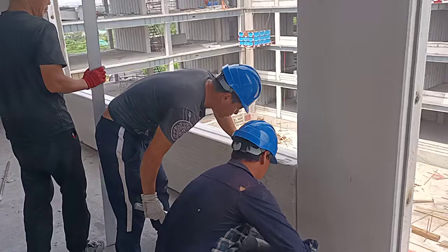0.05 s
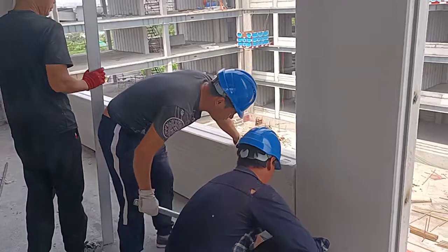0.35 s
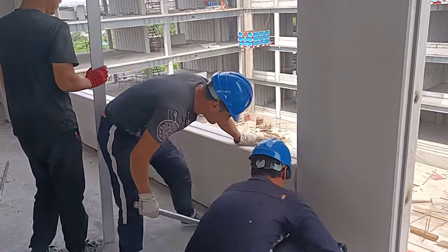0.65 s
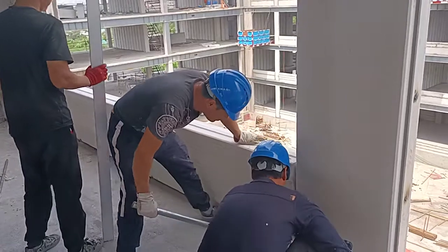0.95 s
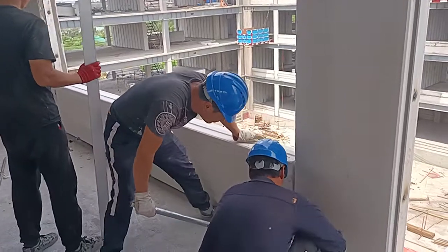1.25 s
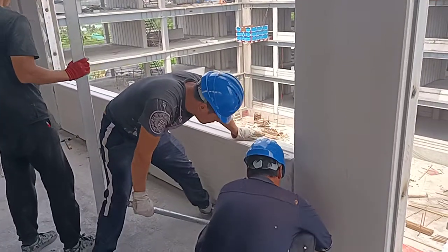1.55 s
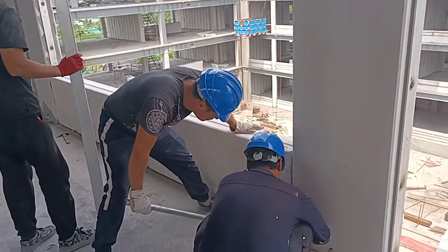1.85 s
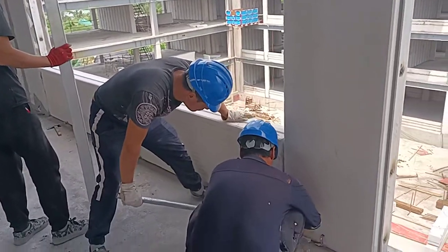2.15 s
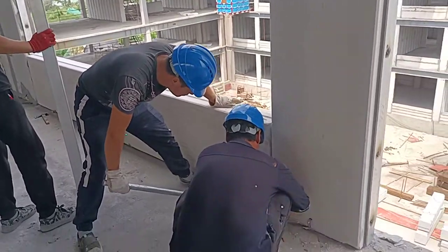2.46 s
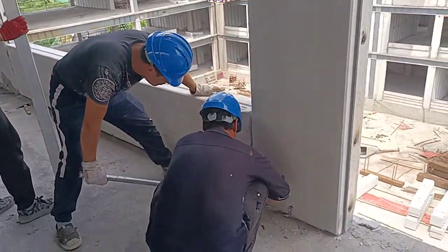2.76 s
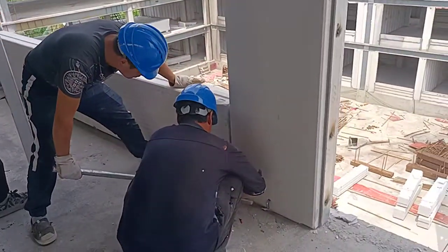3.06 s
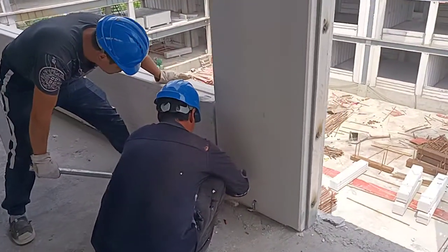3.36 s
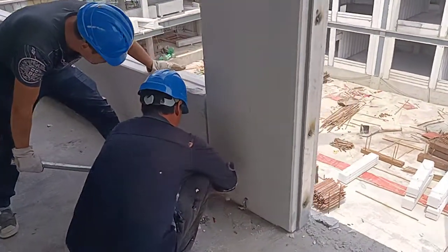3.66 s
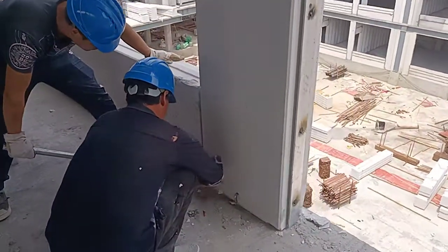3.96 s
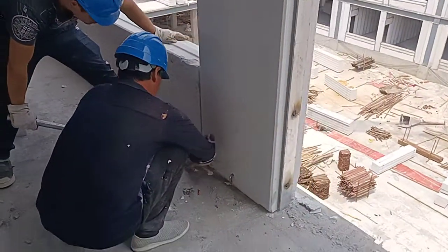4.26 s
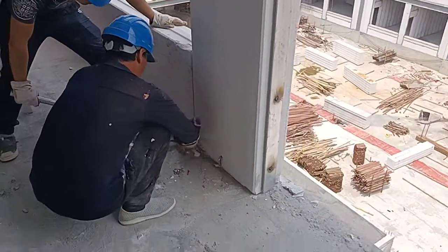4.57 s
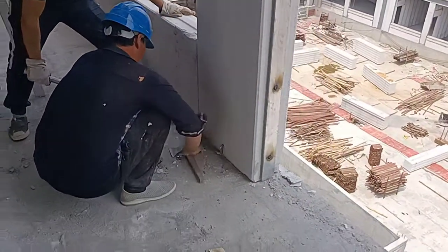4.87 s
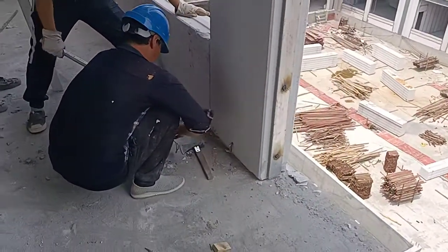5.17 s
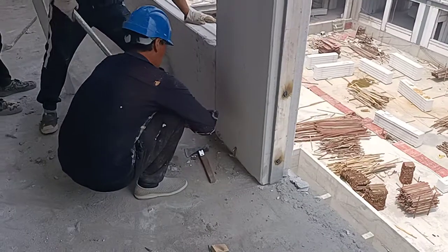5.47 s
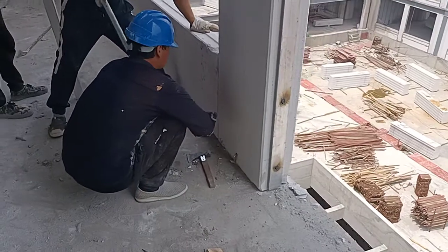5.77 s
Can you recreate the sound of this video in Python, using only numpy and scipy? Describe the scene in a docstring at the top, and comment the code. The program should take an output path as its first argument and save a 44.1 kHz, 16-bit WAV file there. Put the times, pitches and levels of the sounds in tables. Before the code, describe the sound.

A hammer drives a steel wedge under a concrete panel with seven sharp, booming blows, then tools clink and scrape over distant machinery.

```python
"""An open floor of a building site, heard through the two ports of a stereo microphone.
Nearby, a worker drives a steel wedge under a concrete wall panel with seven hammer blows, one a double
strike. Each blow cracks, the panel booms, higher as it tightens, and bare slabs throw both back.
The hammer is laid down with a few clinks and a steel pry bar scrapes free; boots thud and grit scuffs.
Far off, a machine hums and clatters through two runs, over the hiss of the site."""
import sys
import numpy as np
from scipy import signal
from scipy.fft import rfft, irfft
from scipy.io import wavfile
from scipy.ndimage import uniform_filter1d

SR = 44100
rng = np.random.default_rng(int(sys.argv[2]) if len(sys.argv) > 2 else 0)


def pcm_store(signal):
    """Save signal as 16-bit PCM."""
    levels = np.round(np.clip(np.atleast_2d(signal), -1, 1) * 32767)
    wavfile.write(sys.argv[1], SR, levels.astype(np.int16).T)


N = 256220
TIME, BINS = np.arange(N) / SR, np.fft.rfftfreq(N, 1 / SR)
AGE = np.arange(SR) / SR  # seconds since an impact


# The hammer blows, near the microphone. Each row: start in seconds, force in dB, squareness as
# brightness in dB per octave, then the relative levels in dB of wash, wedge clang and concrete knock.
BLOWS = [(2.596, -23, -2, -3.5, -17, -14), (2.938, -13, 2, -7.5, -4.5, -16.5),
         (3.3008, -12, 1, -12.5, -8.5, -15.5), (3.7061, -12.5, 0.65, -5, -13, -13),
         (4.0305, -14.5, 3.5, -4.5, -21, -19.5), (4.2893, -22, 2.5, -17.5, -21.5, -4.5),
         (4.2993, -16, 0, -14.5, -35.5, -11), (4.553, -16, 2.5, -8, -13, -13)]

def hammering(loose_tilt=-19.5, tight_tilt=6.5, full_force_db=-13, take_up=0.48):
    """Each blow drives the wedge in and tightens the panel; a square one cracks louder and longer."""
    out, slack = np.zeros((2, N)), 1
    for start, force_db, square, wash_db, clang_db, knock_db in BLOWS:
        spot_db = struck_spot()
        tilt = tight_tilt + (loose_tilt - tight_tilt) * slack  # of the panel's modes, dB per octave
        crack_db = -0.55 + 0.37 * square
        boom_db = 4 + 0.24 * tilt  # a tight panel takes more of the blow
        steel = wedge_crack(square, spot_db) + amp(clang_db) * wedge_clang()
        wash = slab_wash(square, spot_db, hold_s=0.041 + 0.0089 * square)
        concrete = knock(hz=955, width_hz=400, t60=0.054, room_db=-7.5)
        blow = amp(crack_db) * steel + amp(wash_db) * wash + amp(knock_db) * concrete
        blow += amp(boom_db) * panel_boom(tilt)
        add(out, start, amp(force_db) * blow + amp(tilt - 38) * head_ring(spread_db=3))
        # a full blow takes up the share take_up of the remaining slack
        slack *= 1 - min(take_up * amp(force_db - full_force_db) ** 2, 1)
    return out


# The modes of the steel wedge. Each row: frequency in Hz, level in dB.
WEDGE_MODES = [(1400, -7), (1880, 0), (2350, 1), (2940, -1.5), (3580, -1.5), (4300, 0), (5175, -3),
               (5900, -8.5), (6950, -5)]
# Floor and nearest walls, as heard at the microphone. Each row: echo delay in seconds, level in dB.
EARLY_ECHOES = [(.0128, -4), (.0212, -2), (.0235, -8), (.0305, -11), (.0375, -9), (.0445, -9)]

def wedge_crack(bright, spot_db, width_hz=380, detune=0.01):
    """Steel meets the wedge: its modes burst out, a trace sings on, near surfaces repeat the burst."""
    body = sum(amp(db) * resonance(np.arange(len(spot_db)), f, width_hz) ** 2 for f, db in WEDGE_MODES)
    modes = [(f * (1 + detune * rng.uniform(-1, 1)), db + bright * np.log2(f / 3000))
             for f, db in WEDGE_MODES]

    def burst(tilt):
        return diffuse(lambda hz: amp(tilt_db(hz, tilt) + spot_db / 2) * body, SR)

    def steel(t60):
        return ring([(f, db, t60) for f, db in modes], spread_db=4) * rising(0.0011)

    out = amp(1) * burst(bright) * dying(0.036, hold_s=0.0016)
    out += amp(-7) * steel(t60=0.022) + amp(-22) * steel(t60=0.38)
    for delay, db in EARLY_ECHOES:
        add(out, delay, amp(db) * burst(bright + 2.5) * dying(0.014, hold_s=0.001))
    return out


def wedge_clang(return_s=0.2):
    """The wedge clangs, and the far wing of the building sends the clang back."""
    envelope = dying(0.25) + amp(-14) * dying(0.41) + amp(-23) * swell(AGE, return_s, 0.12)
    return noise_band(2080, 480, SR) * envelope


# The modes of the concrete panel. Each row: frequency in Hz, level in dB, 60 dB decay time in seconds.
PANEL_MODES = [(118.5, -12, 0.32), (142.5, -12.5, 0.53), (169.8, -13, 1), (192.3, -4.5, 0.62),
               (234.5, -5.5, 0.28), (268.5, -2.5, 0.62), (328, -3, 0.52), (341.7, -5.5, 0.96),
               (429.7, 0, 0.63), (541, -12.5, 0.7), (632, -12, 0.29), (759, -22.5, 0.3)]

def panel_boom(tilt, delay_s=0.01374, lurch_hz=310, detune=0.01, blur_hz=20):
    """The heavy panel lurches just after the crack, then rings; tilt weights its upper modes."""
    t = AGE - delay_s
    lurch = swell(AGE, delay_s, 0.0026) * np.cos(2 * np.pi * lurch_hz * t)
    build = 0.36 * rising(0.0059) + np.clip(t / 0.0097, 0, 1)
    # the panel shifts in its seat, so its notes differ from blow to blow
    modes = [(hz * (1 + detune * rng.uniform(-1.056, 1)), db + tilt * np.log2(max(hz, 300) / 300), t60)
             for hz, db, t60 in PANEL_MODES]

    def blurred_notes(hz):
        notes = np.sqrt(sum((amp(db) * resonance(hz, f, blur_hz)) ** 2 for f, db, _ in modes))
        return notes * resonance(hz, 260, 1200) * hz / np.hypot(hz, 70)

    room = diffuse(blurred_notes, SR) * dying(0.66)
    return amp(4) * lurch + build * (amp(-11) * ring(modes, spread_db=2) + amp(-9.5) * room)


# A blow as it comes back off the bare slabs. Each row: frequency in Hz, spectral level in dB.
WASH_SPECTRUM = [(400, -16), (750, -3), (1100, -4), (1500, -4), (2050, 1.5), (2700, 1), (4400, -2.5),
                 (5900, -6.5), (7000, -11.5), (12000, -74)]

def slab_wash(bright, spot_db, hold_s, rattle_db=3.2):
    """Near reflections thicken and die fast, rattling with grit; far parts of the building ring on."""
    def reflections(tilt):
        return diffuse(lambda hz: amp(at_hz(WASH_SPECTRUM, hz) + tilt_db(hz, tilt) + spot_db)
                       * hz / np.hypot(hz, 130), SR)

    near = reflections(bright) * dying(0.36, hold_s)
    far = reflections(1.8 * bright + 0.36) * dying(1.0, hold_s)
    rattle = unit(amp(rattle_db * wander(250)))[:SR]
    return rising(0.038) * (rattle * near + amp(-12) * far)


# The modes of the hammer head. Each row: frequency in Hz, level in dB, 60 dB decay time in seconds.
HEAD_MODES = [(3560, 2, .16), (6580, -1, .14), (11100, -6, .13)]

def head_ring(spread_db):
    """The steel hammer head rings high and briefly."""
    return ring(HEAD_MODES, spread_db)


# Steel tools touch the floor nearby. Each row: start in seconds, level in dB, pitch in Hz.
TOOL_CLINKS = [(4.813, -20, 4330), (4.812, -28.5, 2930), (4.918, -26, 3670), (4.969, -22, 2860),
               (4.968, -30, 2040), (5.014, -38, 2800)]
# The hammer head rings freely as it is laid down. Each row: start in seconds, level in dB.
HEAD_TOUCHES = [(4.815, -35), (4.918, -26)]

def tools_laid_down():
    """Steel clacks on concrete and rings; the higher a clink, the sooner it dies."""
    out = np.zeros((2, N))
    for start, db, hz in TOOL_CLINKS:
        t60 = 0.045 * (3000 / hz) ** 2
        steel = ring([(hz, 0, t60)], spread_db=0)
        add(out, start, amp(db) * (knock(hz, hz / 5, t60) / 2 + steel))
    for start, db in HEAD_TOUCHES:
        add(out, start, amp(db) * head_ring(spread_db=0))
    return out


# The modes of the rubbed pry bar. Each row: frequency in Hz, level at mid-slide in dB, width in Hz,
# level change along the slide in dB per second.
BAR_MODES = [(1887, -3.5, 86, 15), (2300, 0.5, 310, -23), (2610, -4, 26, 21), (2920, -14, 50, 43),
             (3360, -5, 60, -7), (4210, -3.5, 160, 9), (5090, -8.5, 61, 14), (11050, -8, 870, 6)]

def pry_bar(start_s=5.255, stop_s=5.57, rise_s=0.026, fall_db_per_s=187, sag_per_s=0.044):
    """Grit rubs the bar until it comes free; as the contact slides, its modes flare and sag in pitch."""
    slide_s = np.clip(TIME, start_s, stop_s) - (start_s + stop_s) / 2
    steel = sum(amp(db + drift * slide_s + 2.3 * wander(14)) * noise_band(hz, width, N)
                for hz, db, width, drift in BAR_MODES)
    sagging = np.cumsum(1 - sag_per_s * slide_s)
    steel = np.array([np.interp(sagging, np.arange(N), port, period=N) for port in steel])
    grit = diffuse(lambda hz: resonance(hz, 3200, 4600), N) * amp(2 * wander(150))
    attack = np.clip((TIME - start_s) / rise_s, 0, 1)
    level = amp(-34.5 - fall_db_per_s * np.maximum(TIME - stop_s, 0))
    shared_flare = amp(1.5 * wander(11))
    return attack * level * (shared_flare * steel / 2 + amp(-10.5) * grit)


def tap_and_ping(tap_s=2.27, ping_s=5.282):
    """The wedge is set in place with one dull tap; later the pry bar pings as it catches."""
    out = np.zeros((2, N))
    add(out, tap_s, amp(-36) * knock(hz=1900, width_hz=950, t60=0.12))
    add(out, ping_s, amp(-31) * knock(hz=7310, width_hz=62, t60=0.14))
    return out


# The worker's steps on the slab. Each row: start in seconds, level in dB.
BOOT_STEPS = [(0.758, -42), (2.23, -46.5), (4.967, -41.5)]

def boots():
    """Each boot comes down with a dull thud."""
    out = np.zeros((2, N))
    for start, db in BOOT_STEPS:
        add(out, start, amp(db) * knock(hz=244, width_hz=99, t60=0.95))
    return out


# Slides on the gritty floor. Each row: middle in seconds, level in dB, centre in Hz,
# half length in seconds.
GRIT_SCUFFS = [(0.434, -43, 2300, 0.067), (2.54, -46.5, 6760, 0.28), (2.593, -33.5, 260, 0.036),
               (2.612, -24.5, 2270, 0.021), (2.613, -29.5, 5770, 0.027), (4.887, -31.5, 2520, 0.031),
               (5.002, -31.5, 2300, 0.037)]

def scuffs(grain_db=3):
    """Boots, tools and the loose wedge slide over grit: grainy rubs that swell and fade."""
    rubs = sum(amp(db) * swell(TIME, middle, half) * noise_band(hz, hz / 1.5, N)
               for middle, db, hz, half in GRIT_SCUFFS)
    return rubs * unit(amp(grain_db * wander(80)))


# Two runs of the machine, far from the microphone. Each row: time in seconds, then the relative
# levels in dB of hum, lower clatter and upper clatter.
FIRST_RUN_LEVELS = [(.3, -54, -52, -40.5), (.41, -55.5, -43.5, -41.5), (.5, -55.5, -48.5, -41.5),
                    (.76, -53, -44.5, -44.5), (1.04, -48, -48.5, -43.5), (1.2, -48.5, -45.5, -50.5),
                    (1.3, -46.5, -49, -47), (1.47, -47.5, -43.5, -46), (1.65, -50.5, -43, -47.5),
                    (1.79, -53.5, -48, -53), (2.1, -49, -54, -55.5), (2.41, -46.5, -63.5, -63)]
SECOND_RUN_LEVELS = [(4.25, -64, -46, -77), (4.94, -58.5, -43, -53), (5.308, -76, -54.5, -60.5),
                     (5.8, -57.5, -38, -39.5)]
# The resonances its strokes rattle. Each row: centre in Hz, width in Hz, relative level in dB.
CLATTER_RESONANCES = [(712, 70, 0), (1435, 120, -3), (1920, 130, -7), (2620, 160, -13)]
FIRST_STROKE_HZ, SECOND_STROKE_HZ = 46.75, 43.05  # stroke rates under load

def machine(waver=0.0012):
    """A distant machine runs twice: its strokes hum, whine and clatter over a wide rush."""
    first = machine_run(FIRST_RUN_LEVELS, FIRST_STROKE_HZ, settled_rough=0.06)
    second = machine_run(SECOND_RUN_LEVELS, SECOND_STROKE_HZ, settled_rough=0.61)
    # the run with the louder hum takes over
    hum_db, lower_db, upper_db, rough, stroke_hz = np.where(first[0] > second[0], first, second)
    angle = 2 * np.pi * np.cumsum(stroke_hz * (1 + waver * wander(7.3))) / SR
    out = amp(hum_db + 4) * hum(angle, rough) + whine(angle)
    out += amp(upper_db + 1) * noise_band(1300, 1300, N)  # the rush
    for centre, width, db in CLATTER_RESONANCES:
        level_db = lower_db + 5 if centre < 1000 else upper_db + 4
        out += amp(level_db + db) * clatter(angle, rough, centre, width)
    return out


def machine_run(levels, loaded_hz, settled_rough, fade_db_per_s=55, loaded_db=-54):
    """Levels, roughness (0-1) and stroke rate of a run: it starts fast and rough, then settles."""
    start, stop = levels[0][0], levels[-1][0]
    age = np.maximum(TIME - start, 0)
    fade_db = fade_db_per_s * abs(TIME - np.clip(TIME, start, stop))
    hum_db, lower_db, upper_db = np.array(curves(levels)) - fade_db
    rough = settled_rough + (1 - settled_rough) * np.exp(-age / 0.33)
    # as the lower clatter falls below loaded_db the load is off and the machine speeds up
    unloaded = np.clip((loaded_db - lower_db) / 7, 0, 1)
    stroke_hz = loaded_hz + 2.5 * np.exp(-age / 0.12) + 1.2 * unloaded
    return np.array([hum_db, lower_db, upper_db, rough, stroke_hz])


# The overtones of the far hum. Each row: multiple of the stroke rate, relative level in dB.
HUM_OVERTONES = [(3, -0.5), (4, -2.5), (5, -5), (6, -2.5), (7, -3), (8, -6), (12, -1)]

def hum(angle, rough, flutter_db=4):
    """A tone at twice the stroke rate, richer in overtones when the machine runs rough."""
    overtones = sum(amp(db + flutter_db * wander(3.4)) * np.sin(order * angle + 2 * np.pi * rng.random())
                    for order, db in HUM_OVERTONES)
    return np.sin(2 * angle) + amp(1.5) * np.sqrt(rough) * overtones


# Swells of the far whine. Each row: middle in seconds, relative level in dB, half length in seconds.
WHINE_SWELLS = [(.74, -41.5, .09), (1.05, -41, .08), (1.55, -48, .1)]

def whine(angle, order=31, unsteady=0.3):
    """Under load one overtone of the strokes swells into a rough, unsteady tone."""
    level = sum(amp(db) * swell(TIME, middle, half) for middle, db, half in WHINE_SWELLS)
    flutter = 1 + unsteady * wander(20)
    port_offset = np.array([[0], [1]])  # radians
    return 2 * level * flutter * np.sin(order * angle + unsteady * wander(20) + port_offset)


def clatter(angle, rough, centre, width, flicker_db=2, throb=0.15):
    """One resonance rattled at every stroke: tones when the strokes are even, a blur when they are not."""
    orders = round(centre / FIRST_STROKE_HZ) + np.arange(-5, 6)
    tones = sum(resonance(k * FIRST_STROKE_HZ, centre, width) * amp(flicker_db * wander(3))
                * np.sin(k * angle + port_phases(centre)) for k in orders)
    blur = diffuse(lambda hz: resonance(hz, centre, 2.5 * width) ** 1.5, N) * (1 + throb * np.cos(angle))
    return np.sqrt(1 - rough) * unit(tones) + np.sqrt(rough) * unit(blur)


# The site's hiss, all round the microphone. Each row: frequency in Hz, spectral level in dB.
HISS_SPECTRUM = [(25, -25.5), (60, -8), (120, -1.5), (300, -2), (500, -5.5), (1900, -11), (3000, -13.5),
                 (4200, -7), (6500, -10), (12000, -26.5)]
# Its slow ebb. Each row: time in seconds, level in dB.
HISS_LEVELS = [(.3, -41), (2.9, -45.5), (5.8, -44)]

def site_hiss():
    """The wide hiss of the site, wavering slightly."""
    level_db = curves(HISS_LEVELS)[0] + 0.4 * wander(5)
    return diffuse(lambda hz: amp(at_hz(HISS_SPECTRUM, hz)), N) * amp(level_db)


def knock(hz, width_hz, t60, room_db=-14):
    """Something meets concrete: a pitched clack over a broad body, with a short tail in the room."""
    spot = amp(struck_spot())
    clack = noise_band(hz, width_hz, SR)
    body = diffuse(lambda f: resonance(f, hz, 2.7 * hz) ** 2 * spot, SR)
    envelope = rising(0.0027) * (dying(t60, hold_s=0.0017) + amp(room_db) * dying(0.32))
    return envelope * unit(clack + amp(-4) * body)


def struck_spot():
    """Crowded resonances of wedge and concrete: rounded peaks and deep dips, in dB for each Hz."""
    def ripple(span_hz):
        noise = rng.standard_normal(SR // 2 + 1)
        return unit(uniform_filter1d(uniform_filter1d(noise, span_hz), span_hz))

    ripple_db = 3.3 * ripple(130) + 2.6 * ripple(35)
    return np.minimum(ripple_db, 6 * np.tanh(ripple_db / 6))


def ring(modes, spread_db):
    """Decaying modes; each blow lands on another spot and weights them anew by about spread_db."""
    return sum(amp(db + spread_db * rng.standard_normal()) * dying(t60)
               * np.sin(2 * np.pi * hz * AGE + port_phases(hz)) for hz, db, t60 in modes)


# How alike the microphone's two ports hear the site. Each row: frequency in Hz, correlation.
PORT_LIKENESS = [(100, 1), (240, 0.92), (470, 0.87), (920, .5), (1800, -0.12), (7000, 0)]

def diffuse(gain, size):
    """Noise of spectrum gain(Hz) from all sides: alike at both ports in the bass only."""
    hz = np.fft.rfftfreq(size, 1 / SR)
    left, other = rfft(rng.standard_normal((2, size)))
    like = at_hz(PORT_LIKENESS, hz)
    right = like * left + np.sqrt(1 - like ** 2) * other
    return unit(irfft(np.array([left, right]) * gain(hz), size))


def port_phases(hz):
    """A random phase at each port; the two drift apart as the wavelength shrinks."""
    apart = np.arccos(at_hz(PORT_LIKENESS, hz)) / np.sqrt(2)
    return 2 * np.pi * rng.random() + apart * rng.standard_normal((2, 1))


def noise_band(centre_hz, width_hz, size):
    """Diffuse noise passed twice through one resonance."""
    return diffuse(lambda hz: resonance(hz, centre_hz, width_hz) ** 2, size)


def resonance(hz, centre, width):
    """Gain of one resonance."""
    return 1 / np.sqrt(1 + ((hz ** 2 - centre ** 2) / (width * hz + 1e-9)) ** 2)


def tilt_db(hz, db_per_octave):
    """A spectral slope about 3 kHz, flat below 500 Hz and above 7 kHz."""
    return db_per_octave * np.log2(np.clip(hz, 500, 7000) / 3000)


def at_hz(points, hz):
    """Reads a spectrum on a log-frequency axis."""
    f, value = np.transpose(points)
    return np.interp(np.log(hz + 1), np.log(f + 1), value)


def rising(rise_s):
    """Envelope that climbs to 1 in rise_s and stays."""
    return np.minimum(AGE / rise_s, 1)


def dying(t60, hold_s=0):
    """Envelope that holds for hold_s, then falls 60 dB in t60 seconds."""
    return np.exp(-np.log(1000) * np.maximum(AGE - hold_s, 0) / t60)


def swell(t, middle_s, half_s):
    """Bell-shaped envelope."""
    return np.exp(-((t - middle_s) / half_s) ** 2)


def wander(rate_hz):
    """Smooth random motion of rms 1, mostly slower than rate_hz."""
    coarse = rng.standard_normal(4096)
    hz = np.fft.rfftfreq(len(coarse), N / SR / len(coarse))
    slow = irfft(rfft(coarse) * np.exp(-(hz / rate_hz) ** 2))
    return unit(np.interp(TIME, np.linspace(0, N / SR, len(slow)), slow))


def curves(rows):
    """Each column of a time table at every sample."""
    times, *columns = np.transpose(rows)
    return [np.interp(TIME, times, column) for column in columns]


def amp(db):
    """Decibels to gain."""
    return 10 ** (np.asarray(db) / 20)


def unit(x):
    """Scales to rms 1."""
    return x / np.sqrt(np.mean(x ** 2) + 1e-20)


def add(mix, start_s, sound):
    """Mixes a sound in at start_s."""
    part = mix[:, round(start_s * SR):][:, :sound.shape[-1]]
    part += sound[..., :part.shape[1]]


def scene():
    """The work nearby and the site beyond, as they reach the two ports."""
    work = hammering() + tools_laid_down() + boots() + tap_and_ping() + pry_bar()
    return work + machine() + site_hiss() + scuffs()


# The microphone's right port is louder from about 1 to 7 kHz, its left above 8 kHz.
# Each row: frequency in Hz, left minus right in dB.
PORT_BALANCE = [(170, 0.5), (860, -0.5), (1460, -6.5), (2480, -7), (4220, -2.5), (7190, -12.5), (8200, 8),
                (15000, 33.5)]
# The recorder's treble, falling steeply above 7.5 kHz. Each row: frequency in Hz, gain in dB.
RECORDER_TREBLE = [(7000, 1), (7500, -0.5), (8000, -14), (8700, -20.5), (10000, -15.5), (11200, -29.5),
                   (12500, -42.5), (15500, -46.5)]

def record(dry, fade_start_s=0.066, fade_s=0.2, gain_db=-2.5, edge_hz=15800):
    """The ports colour the sound; the recorder fades in, overloads softly and limits the band."""
    ports = amp(at_hz(RECORDER_TREBLE, BINS) + np.array([[0.5], [-0.5]]) * at_hz(PORT_BALANCE, BINS))
    fade = np.clip((TIME - fade_start_s) / fade_s, 0, 1) ** 3.7
    heard = irfft(rfft(dry) * ports, N) * fade * amp(gain_db)
    limited = heard / (1 + heard ** 8) ** (1 / 8)
    lowpass = signal.firwin(511, edge_hz, window=("kaiser", 9), fs=SR)
    return signal.oaconvolve(limited, lowpass[None], "same")


dry = scene()
out = record(dry)
pcm_store(out)
```